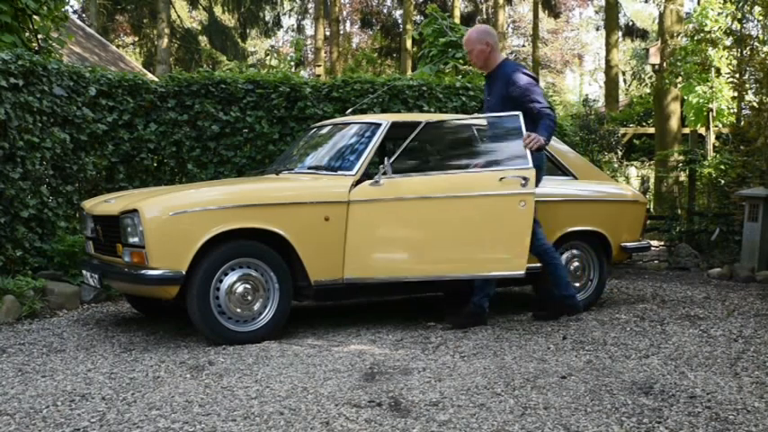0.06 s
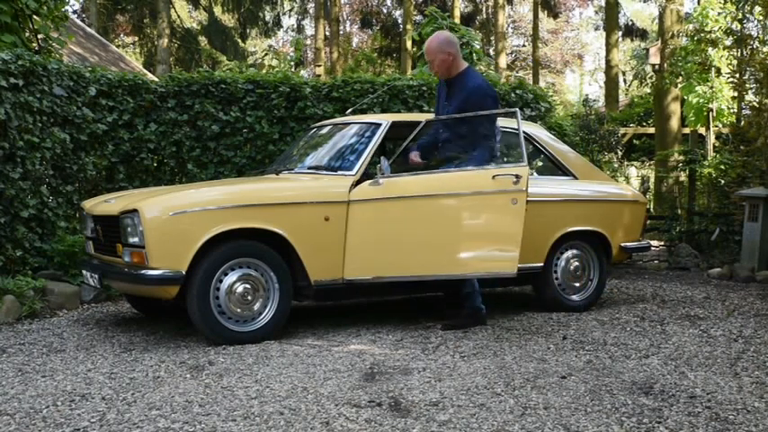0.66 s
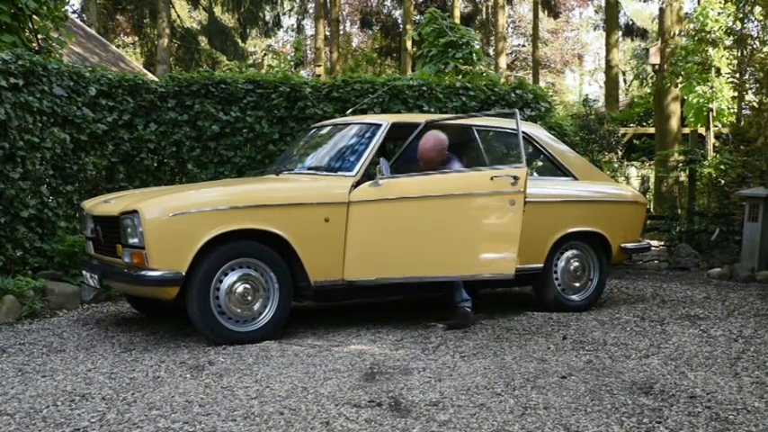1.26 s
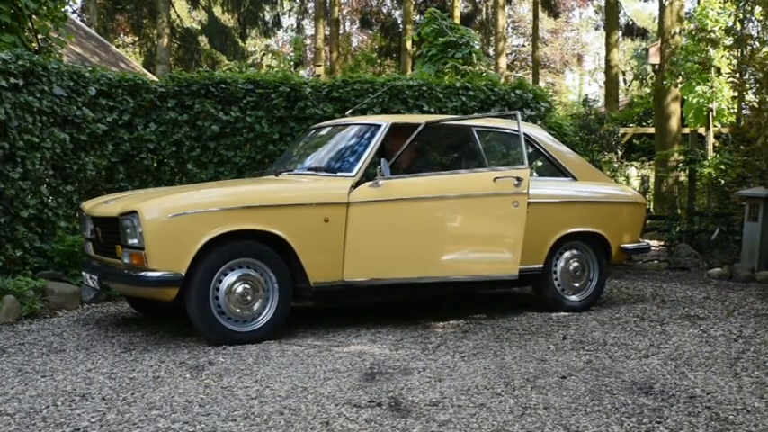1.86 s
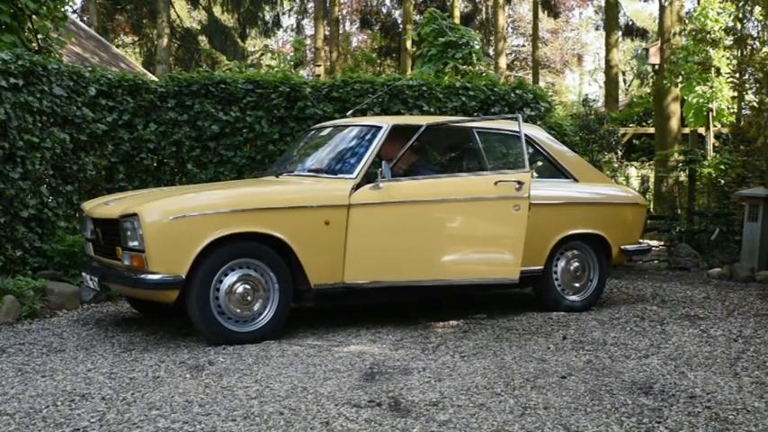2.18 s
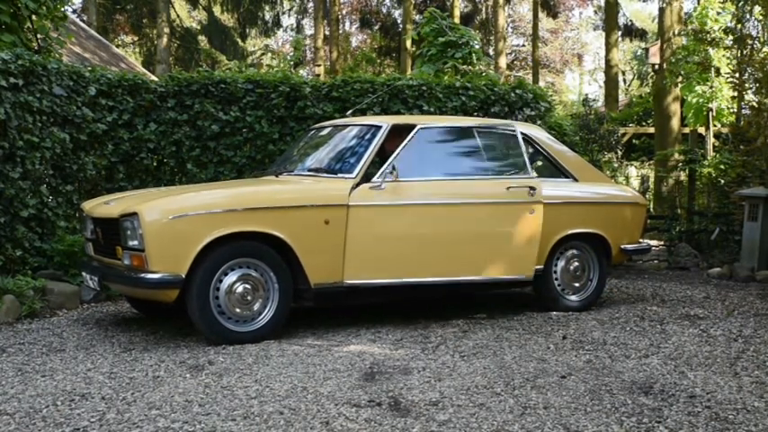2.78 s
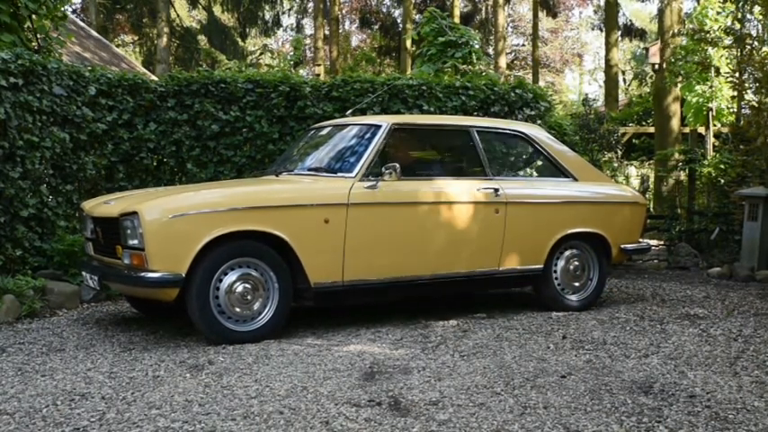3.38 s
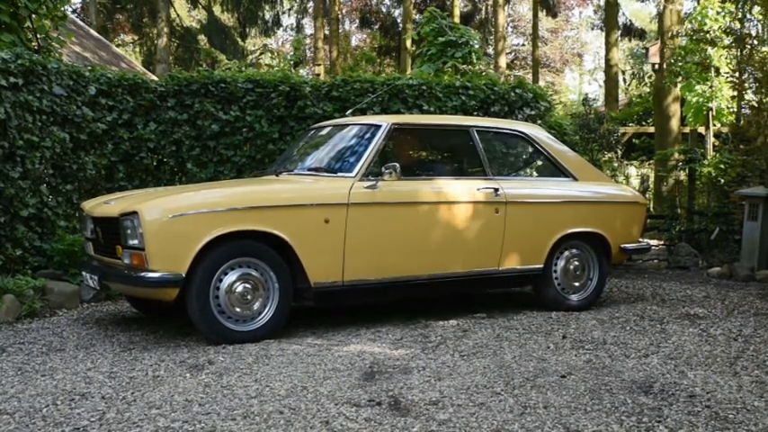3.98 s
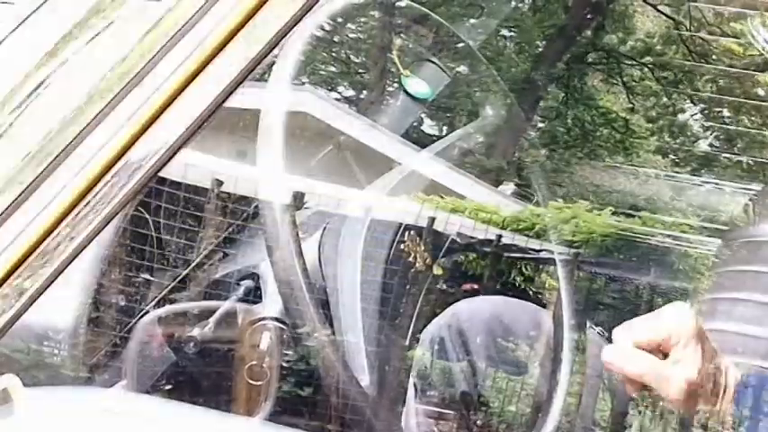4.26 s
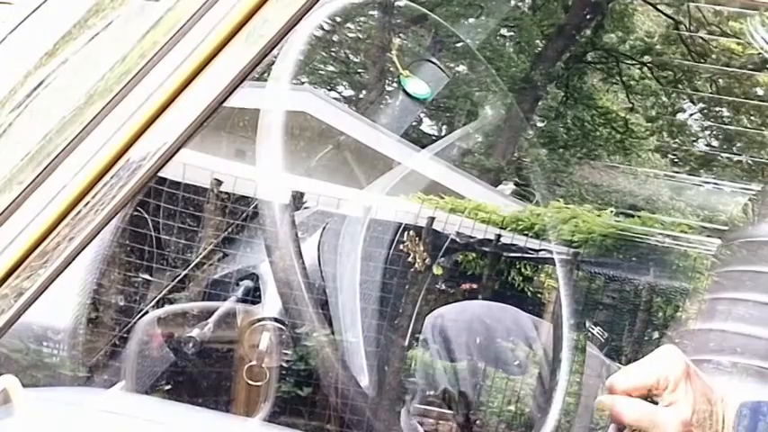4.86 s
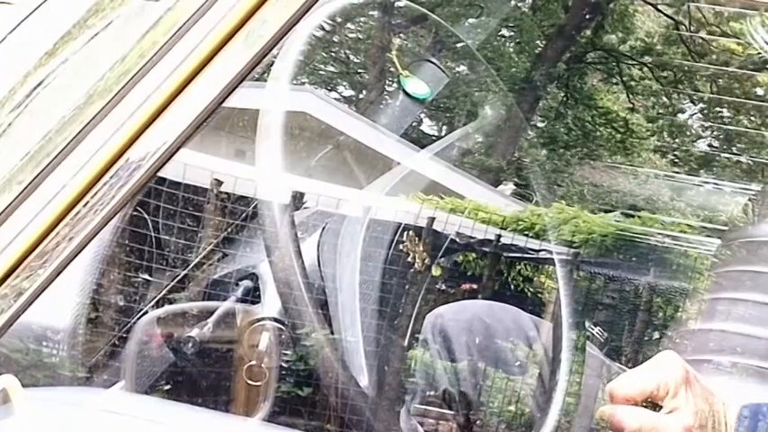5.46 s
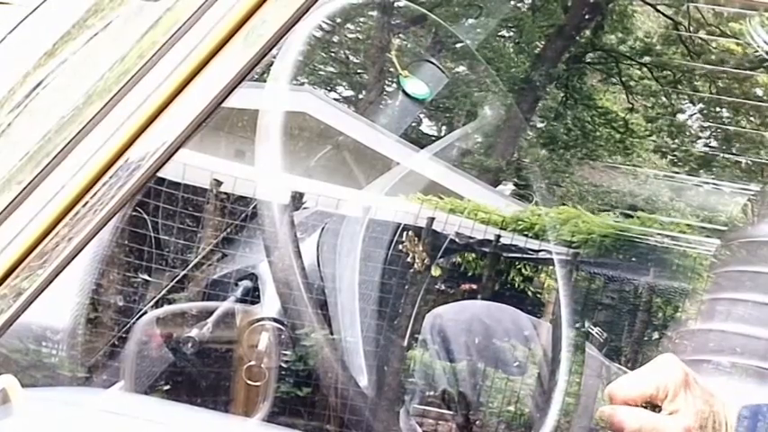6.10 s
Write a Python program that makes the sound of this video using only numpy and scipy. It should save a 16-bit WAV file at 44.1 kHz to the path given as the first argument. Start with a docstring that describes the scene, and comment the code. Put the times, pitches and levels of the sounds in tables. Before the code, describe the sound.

Amid birdsong outdoors, a car door clicks and then slams with a metallic snap and boom, before a finch sings.

```python
"""Car door and finch

Close up in a gravel yard, a man climbs into an old car: cloth hisses, shoes grind, the door stay clicks.
He pulls the door shut: the steel latch snaps twice and the panels boom. A bird twitters hoarsely and
others whistle far off in the woods. Then the scene changes to a quieter spot by the windscreen,
where a finch sings one phrase to the left of the microphones, echoed by the trees."""
import sys
import numpy as np
from scipy import signal
from scipy.fft import rfft, irfft
from scipy.io import wavfile
from scipy.ndimage import map_coordinates

SR = 44100
rng = np.random.default_rng(int(sys.argv[2]) if len(sys.argv) > 2 else 0)


def unload_audio(sound):
    """Save the sound as a 16-bit wav file, at the path given as the first command line argument."""
    columns = np.transpose(np.atleast_2d(sound))
    # keep every value between -1 and 1, then stretch to whole-number steps
    steps = np.round(np.clip(columns, -1, 1) * 32767)
    wavfile.write(sys.argv[1], SR, steps.astype(np.int16))


N = 270333
TIME = np.arange(N) / SR
CHANGE_S = 4.158  # from the yard to the windscreen


# steel striking steel, close up: (time [s], level [dB], tilt [dB/octave], t60 [s])
LATCH_HITS = [(3.4625, -16.5, 0.5, .035), (3.474, -28, -1, 0.087), (3.4905, -17.5, -1.5, .055),
              (3.4985, -21, -1, .03), (3.5068, -6.5, 0.5, .012), (3.5085, -11.5, 1.5, 0.031),
              (3.5235, -27.5, -6.5, .06), (3.533, -30.5, 8.5, .04), (3.555, -30.5, -2, .04)]
# spectrum of each hit: (frequency [Hz], level [dB])
LATCH_COLOUR = [(150, -11), (450, -7), (800, -8.5), (1050, -5.5), (1350, 1), (2100, -3), (2850, 1),
                (3900, -8.5), (5300, -6), (6500, -13), (8000, -10.5), (10000, -21.5), (11500, -15),
                (15000, -40)]
# ring of latch and door frame: (frequency [Hz], level [dB], t60 [s])
LATCH_MODES = [(585, -4, .3), (657, -5, .25), (791, -5, .2), (912, -7, .2), (1300, -2, .17),
               (1338, -2, .17), (1414, 0, .17), (1788, -4, .16), (1880, -4, .2), (2702, -1, .18),
               (2930, 1, .13), (4791, -4, .13), (5356, -1, .1), (7294, -10, .15), (8193, -10, .15)]
def latch(ring_db=-33.5):
    """The claw passes the safety catch, snaps home and rattles; the yard throws it back."""
    steel = blows(LATCH_HITS, LATCH_COLOUR, rise_s=.00022, width=.59)
    steel += amp(ring_db) * struck(LATCH_HITS, LATCH_MODES)
    return steel + amp(-8.7) * echoes(steel, YARD_T60, delay_s=.0042)


# the door pressing on its rubber seal: (time [s], level [dB], length [s])
SEAL_PUSHES = [(3.4502, -32.5, .002), (3.4968, -11.5, 0.0021), (3.5146, -22.5, .002)]
# door panels and cabin air: (frequency [Hz], level [dB], t60 [s])
PANEL_MODES = [(49, -12, .11), (75.5, -8, .58), (123, -9, .42), (157.5, -2, .27), (195.4, -3, .3),
               (225, -12, .23), (276, -13, .42), (345, -19, .22), (481, -20, .22)]
# the car body shaking, close up: (time [s], level [dB], tilt [dB/octave], t60 [s])
SHAKES = [(3.451, -23.5, 4.5, 0.075), (3.463, -25, -1.5, 0.36), (3.497, -21, 0, 0.29),
          (3.56, -23, -5.5, 0.32)]
# spectrum of the shaking: (frequency [Hz], level [dB])
SHAKE_COLOUR = [(25, -6.5), (70, 0.5), (160, -0.5), (300, -1), (450, -7), (650, -8), (1200, -22),
                (4000, -63.5)]
def door_boom(swell_s=.0057):
    """The seal hands the door's momentum to panels and cabin, and the whole body shakes."""
    out, t = np.zeros((2, N)), TIME[:SR]
    panels = ring(PANEL_MODES, t) * (1 - np.exp(-t / swell_s))
    for s, db, length in SEAL_PUSHES:
        push = np.sin(np.pi * np.minimum(t[:SR // 20] / length, 1))
        add(out, s, amp(db) * signal.fftconvolve(panels, push / push.sum()))
    return out + blows(SHAKES, SHAKE_COLOUR, rise_s=.002, width=.9)


# clicks and knocks at the open door: (time [s], level [dB], tilt [dB/octave], t60 [s])
CLICKS = [(.1612, -39.5, 6, .015), (.2042, -40.5, 5, .02), (.4015, -31, -6, .018), (.8078, -22, 0, 0.024),
          (.810, -19.5, 0.5, 0.036), (.837, -47, 11, 0.039), (.992, -36, -6, 0.034),
          (1.022, -35.5, -1.5, 0.032), (2.98, -38, -7.5, 0.051)]
# spectrum of each click: (frequency [Hz], level [dB])
CLICK_COLOUR = [(150, -15.5), (350, -5.5), (900, -13.5), (1250, -3), (1500, 4.5), (1850, -5), (2700, -8),
                (3600, -4), (4800, -17), (6500, -15), (9000, -24.5), (14000, -43)]
# ring of the stay: (frequency [Hz], level [dB], t60 [s])
STAY_MODES = [(1520, 3, 0.085), (1540, -31.5, 0.087), (1920, -9, 0.19), (2500, -9, 0.12), (3700, -29, 0.1),
              (5717, -26, .15)]
def door_stay(ring_db=-19.5):
    """The door stay jumps its notch; smaller knocks sound as the man gets in."""
    steel = blows(CLICKS, CLICK_COLOUR, rise_s=.00032, width=.44)
    steel += amp(ring_db) * struck(CLICKS, STAY_MODES)
    return steel + amp(-6.3) * echoes(steel, YARD_T60, delay_s=.006)


# bumps in the seat, heard from both spots: (time [s], level [dB], tilt [dB/octave], t60 [s])
BUMPS = [(.398, -37, 6, .07), (.809, -33, 3.5, 0.13), (.97, -37.5, -1, 0.36), (1.2, -33, -2.5, 0.13),
         (1.4, -38.5, -5, 0.32), (1.455, -38, -6, 0.28), (1.6, -38, -3.5, 0.32), (3.865, -41, -20, 0.24),
         (5.283, -49, 3.5, 0.16), (5.69, -57, 2.5, 0.2), (5.865, -46, -4.5, 0.12),
         (5.987, -50.5, -0.5, 0.15)]
# their dull spectrum: (frequency [Hz], level [dB])
BUMP_COLOUR = [(40, -2.5), (130, 0.5), (300, 1.5), (700, -7), (1400, -19), (4000, -34), (12000, -63)]
def seat(fidgets=6, gap_s=.22, fidget_db=-56, tilt_db=1.5, t60_s=.24):
    """The man bumps about as he settles, then fidgets faintly at uneven intervals."""
    steps = np.arange(1, fidgets + 1) + rng.uniform(-.5, .5, fidgets)
    faint = [(CHANGE_S + step * gap_s, fidget_db, tilt_db, t60_s) for step in steps]
    return blows(BUMPS + faint, BUMP_COLOUR, rise_s=.0045, width=.81)


# clothes sliding over the seat, near the microphones: (start [s], length [s], level [dB])
SLIDES = [(.046, .095, -42.5), (.14, 0.17, -53.5), (.92, 0.32, -44), (1.09, 0.095, -44),
          (1.425, 0.2, -45.5), (1.575, .1, -42), (1.625, .19, -52)]
# hiss of the cloth: (frequency [Hz], level [dB])
CLOTH_COLOUR = [(1500, -27.5), (3000, -3), (5000, -2.5), (7800, 3.5), (10500, 0.5), (13000, -2.5),
                (15000, -15)]
# shoes on the ground beside the car: (start [s], length [s], level [dB])
SCUFFS = [(.03, 0.3, -45), (.935, .2, -43), (1.1, 0.24, -48.5), (1.43, 0.083, -45)]
# crunch of the gravel: (frequency [Hz], level [dB])
GRAVEL_COLOUR = [(200, 5), (500, 1), (1200, 1.5), (2500, -3), (5000, -21.5)]
def rustle(cloth_grain_db=1.5, gravel_grain_db=3.5, grow_db_per_s=52):
    """Cloth hisses over the seat and shoes grind the gravel; both swell as the yard scene ends."""
    growing = amp(grow_db_per_s * np.minimum(TIME - CHANGE_S, 0))
    sliding = strokes(SLIDES, peak_share=.3) + amp(-51.5) * growing
    scuffing = strokes(SCUFFS, peak_share=.31) + amp(-51) * growing
    cloth = unit(noise(CLOTH_COLOUR, N) * amp(cloth_grain_db * wobble(300, N)))
    gravel = unit(noise(GRAVEL_COLOUR, N) * amp(gravel_grain_db * wobble(400, N)))
    return sliding * cloth + scuffing * gravel


# two high chips, left of the windscreen: (time [s], level [dB])
CHIPS = [(5.15, -47), (5.233, -45)]
# path of one chip: (time in the note [s], pitch [Hz], level [dB])
CHIP_PATH = [(0, 4430, -5), (.006, 7200, -12), (.018, 7500, -14), (.021, 5700, -5), (.027, 6350, -16),
             (.031, 5100, 7), (.038, 5610, 0), (.042, 4000, 1)]
# path of the closing flourish: (time in the note [s], pitch [Hz], level [dB])
FLOURISH_PATH = [(0, 2650, -13), (.05, 2240, -3), (.1, 2280, -9), (.13, 3100, -3), (.19, 3680, -1),
                 (.245, 3900, -2.5), (.28, 4100, -12), (.33, 3970, -24.5)]
def finch(flourish_s=5.342, flourish_db=-50.5):
    """A trill, two chips and a buzzy rising flourish, echoed by far woods and a near hedge."""
    song, chips = trill(), np.zeros((2, N))
    add(song, flourish_s, amp(flourish_db) * note(FLOURISH_PATH, buzz=.08, buzz_hz=1102, third_db=-22))
    for s, db in CHIPS:
        add(chips, s, amp(db) * note(CHIP_PATH, buzz=.045, buzz_hz=909, second_db=-24))
    scattered = song + amp(-3) * chips  # leaves soak up the highest notes
    woods = amp(-4.7) * echoes(scattered, WOODS_T60, delay_s=.012)
    hedge = amp(-5) * echoes(scattered, YARD_T60, delay_s=.002)
    direct = place(song + chips, left_db=5.5, lead_s=.000334)
    return direct + place(woods + hedge, left_db=3, lead_s=.0003)


# the finch's upward flick: (time in the note [s], base pitch [Hz], level [dB])
FLICK_PATH = [(0, 4500, -14), (.003, 5150, -2), (.006, 5500, -5), (.009, 7000, -20), (.014, 8200, -28)]
# its falling slur: (time in the note [s], base pitch [Hz], level [dB])
SLUR_PATH = [(0, 4210, -6.5), (.008, 4595, 1.5), (.016, 3850, -2.5), (.036, 3002, 1), (.045, 2243, -10),
             (.056, 3200, 0), (.071, 3000, -7), (.086, 1920, -12.5)]
def trill(count=7, start_s=4.195, gap_s=.1374, loudest_s=4.78, peak_db=-45.5, swell_db_per_s=7):
    """Evenly spaced slurs, each led in by a flick, swell and ease off while the pitch sinks."""
    out = np.zeros((2, N))
    for k in range(count):
        s = start_s + k * gap_s
        db = peak_db - swell_db_per_s * abs(s - loudest_s)
        pitch = 1.01 - .0353 * (s - start_s)
        lead_s = .014
        if k == 0:  # the first slur starts high, its flick early
            pitch += .05
            lead_s += .021
        add(out, s - lead_s, amp(db - 2) * note(FLICK_PATH, pitch, buzz=.032))
        add(out, s, amp(db) * note(SLUR_PATH, pitch, buzz=.0505, buzz_hz=1000, third_db=-28))
    return out


# rasp of a bird in the yard, off to the right: (frequency [Hz], level [dB])
RASP_COLOUR = [(3500, -15), (4800, -7.5), (5300, -4), (6000, -7), (7000, -6.5), (8600, -2.5), (9600, -6.5),
               (10700, -7), (12000, -14), (15000, -28)]
# the squeak that starts each call: (time in the note [s], base pitch [Hz], level [dB])
SQUEAK_PATH = [(0, 5040, -2), (.004, 5680, 2), (.012, 5200, -16), (.04, 5300, -6)]
def twitter(count=10, start_s=1.92, gap_s=.0841, strong_db=-44, weak_db=-49.5,
            attack_s=.0076, fade_s=.044):
    """Short hoarse calls: an opening one, then strong and weak in turn at an even pace."""
    rasp, squeaks, t = np.zeros((2, N)), np.zeros((2, N)), TIME[:2 ** 13]
    swell = (1 - np.exp(-t / attack_s)) * np.exp(-(t / fade_s) ** 2 / 2)
    opening = (1.856, -45.5)  # (time [s], level [dB])
    run = [(start_s + k * gap_s, weak_db if k % 2 else strong_db) for k in range(count)]
    for s, db in [opening] + run:
        pitch = 1 + .0305 * rng.uniform(-1, 1)
        add(rasp, s, amp(db) * swell * noise(RASP_COLOUR, len(t), pitch=pitch))
        add(squeaks, s, amp(db - 1.5) * note(SQUEAK_PATH, pitch, buzz=.06, buzz_hz=900))
    return rasp + squeaks + amp(-.5) * echoes(squeaks, YARD_T60, delay_s=.005)


# birds deep in the woods: (time [s], length [s], start pitch [Hz], end pitch [Hz], level [dB])
WHISTLES = [(.33, .32, 2560, 2450, -61), (1.2, .06, 3080, 3020, -54), (1.245, .1, 3980, 4020, -56.5),
            (1.46, .08, 4200, 4230, -56), (1.695, .03, 3400, 3480, -52), (1.74, .12, 3750, 4050, -55),
            (3.69, .14, 2260, 2120, -56), (3.92, .2, 4080, 4020, -64), (4.47, .15, 1920, 1830, -66),
            (5.7, .24, 5950, 5350, -77.5)]
def far_birds(waver_hz=55):
    """Wavering whistles that reach the microphones mostly as echoes."""
    song = np.zeros((2, N))
    for s, length, start_hz, end_hz, db in WHISTLES:
        arch = [(0, start_hz, -3), (length / 2, (start_hz + end_hz) / 2, 1), (length, end_hz, -4)]
        add(song, s, amp(db) * note(arch, buzz=waver_hz / start_hz, buzz_hz=350))
    woods = amp(-4.5) * echoes(song, WOODS_T60, delay_s=.01)
    yard = amp(-3) * echoes(song, YARD_T60, delay_s=.003)
    return amp(-4) * song + woods + yard


# open air in the yard: (frequency [Hz], level [dB])
YARD_AIR = [(15, -54), (25, -12), (115, -1), (167, -6), (293, -10), (363, -14), (529, -13), (927, -15),
            (1810, -24.5), (2500, -26), (3090, -26.5), (7090, -28.5), (9770, -32), (12800, -39.5),
            (15000, -72)]
# calmer air by the windscreen: (frequency [Hz], level [dB])
WINDSCREEN_AIR = [(22, -11), (45, -3), (64, 5), (95, -14), (170, -15), (300, -22), (650, -27),
                  (1500, -41.5), (2600, -46), (4000, -36), (8000, -53.5), (12800, -46), (14000, -57)]
def air(colour, db, swell_db):
    """Distant roar and leaves, gently swelling."""
    return amp(db + swell_db * wobble(6, N)) * noise(colour, N)


# decay of near reflections around the yard: (frequency [Hz], t60 [s])
YARD_T60 = [(100, 0.54), (500, 0.2), (2000, 0.24), (6000, 0.3), (12000, 0.18)]
# decay of far reflections among the trees: (frequency [Hz], t60 [s])
WOODS_T60 = [(200, .5), (1500, 0.88), (4000, 0.66), (9000, 0.29)]
def echoes(x, t60s, delay_s):
    """Scattered reflections: sparse taps, each band dying at its own speed."""
    taps = rng.choice([-1., 1.], (2, SR)) * (rng.random((2, SR)) < .1)
    hz, t, bands = signal.stft(taps, SR, nperseg=256)
    hz = hz[:, None]
    bands = stereo(*bands, hz) * amp(-60 * t / read(t60s, hz))
    tail = signal.istft(bands, SR, nperseg=256)[1][:, :SR] * (TIME[:SR] > delay_s)
    tail /= np.linalg.norm(tail[0])
    return signal.fftconvolve(x.mean(0)[None], tail, axes=1)[:, :N]


# likeness of diffuse sound at the two microphones: (frequency [Hz], correlation [0..1])
MIC_LIKENESS = [(30, 1), (200, 1), (600, 0.95), (1500, 0.24), (3000, 0.18), (6000, 0.084), (12000, 0.054)]
def stereo(mid, side, hz):
    """Left and right spectra: the bass is alike at both microphones, the treble less so."""
    likeness = read(MIC_LIKENESS, hz)
    mid, side = mid * np.sqrt(1 + likeness), side * np.sqrt(1 - likeness)
    return np.array([mid + side, mid - side])


def place(x, left_db, lead_s):
    """A sound off to one side differs in level and arrival time between the microphones."""
    turn = np.exp(1j * np.pi * np.fft.rfftfreq(N, 1 / SR) * lead_s) * amp(left_db / 2)
    return irfft(rfft(x) * np.array([turn, 1 / turn]), N)


def noise(colour, size, tilt=0, pitch=1):
    """Stereo noise of a given colour, tilted about 1 kHz in dB per octave."""
    hz = np.fft.rfftfreq(size, 1 / SR)
    mid, side = rfft(rng.standard_normal((2, size)))
    octaves = np.log2(np.maximum(hz, 100) / 1000)
    gain = amp(read(colour, hz / pitch) + tilt * octaves) * (hz > 15)
    return unit(irfft(stereo(mid, side, hz) * gain, size))


def blows(rows, colour, rise_s, width):
    """Each contact chatters for a moment: a burst of noise that dies fast."""
    out, t = np.zeros((2, N)), TIME[:2 ** 14]
    for s, db, tilt, t60 in rows:
        burst = noise(colour, len(t), tilt)
        middle = burst.mean(0)
        burst = unit(middle + width * (burst - middle))
        add(out, s, burst * amp(db - 60 * t / t60) * (1 - np.exp(-t / rise_s)))
    return out


def struck(rows, modes):
    """Each contact sets the metal ringing."""
    out, sound = np.zeros((2, N)), ring(modes, TIME[:SR // 2])
    for s, db, *_ in rows:
        add(out, s, amp(db) * sound)
    return out


def ring(modes, t):
    """A sum of dying sines."""
    return sum(amp(db - 60 * t / t60) * np.sin(2 * np.pi * hz * t) for hz, db, t60 in modes)


def strokes(rows, peak_share, roundness=1.4):
    """Level of rubbing: each stroke swells smoothly to its peak and eases off."""
    power = np.zeros(N)
    for s, length, db in rows:
        ramp = np.interp(TIME, [s, s + peak_share * length, s + length], [0, 1, 0])
        power += (amp(db) * np.sin(np.pi / 2 * ramp) ** roundness) ** 2
    return np.sqrt(power)


def note(shape, pitch=1, buzz=.01, buzz_hz=600, second_db=-36, third_db=-31):
    """A bird's near-pure tone along a pitch path; a fast flutter makes it buzz."""
    s, hz, db = np.transpose(shape)
    t = np.arange(0, s[-1], 1 / SR)
    path = pitch * np.interp(t, s, hz) * (1 + buzz * wobble(buzz_hz, len(t)))
    phase = 2 * np.pi * np.cumsum(path) / SR
    tone = np.sin(phase) + amp(second_db) * np.sin(2 * phase)
    tone += amp(third_db) * np.sin(3 * phase) * (3 * path < SR / 2)
    return amp(np.interp(t, s, db)) * tone * signal.windows.tukey(len(t), .04)


def wobble(rate_hz, size):
    """Smooth random motion of rms 1."""
    knots = rng.standard_normal(int(N / SR * 1000))
    return unit(map_coordinates(knots, [np.arange(size) * rate_hz / SR], order=1, mode="wrap"))


def amp(db):
    """Decibels to gain."""
    return 10 ** (np.asarray(db) / 20)


def unit(x):
    """Scales to rms 1."""
    return x / np.sqrt(np.mean(x ** 2) + 1e-20)


def read(points, hz):
    """Reads a table on a log-frequency axis."""
    f, value = np.transpose(points)
    return np.interp(np.log(hz + 1), np.log(f), value)


def add(mix, s, sound):
    """Mixes a sound in at time s."""
    part = mix[:, max(round(s * SR), 0):][:, :sound.shape[-1]]
    part += sound[..., :part.shape[1]]


def scene(crossfade_s=.0067):
    """The yard gives way abruptly to the calm by the windscreen; the far birds carry to both."""
    in_yard = np.clip((CHANGE_S - TIME) / crossfade_s + .5, 0, 1)
    bumps = seat()
    yard = air(YARD_AIR, db=-45.5, swell_db=.47) + bumps + rustle() + door_stay() + latch() + door_boom()
    yard += place(twitter(), left_db=.5, lead_s=-.000207)
    calm = air(WINDSCREEN_AIR, db=-52.5, swell_db=2.1) + bumps
    windscreen = place(calm, left_db=4.5, lead_s=.0001) + finch()
    return in_yard * yard + (1 - in_yard) * windscreen + far_birds()


def record(dry):
    """The recorder passes nothing much above 15 kHz."""
    lowpass = signal.firwin(511, 15000, window=("kaiser", 9), fs=SR)
    return signal.oaconvolve(dry, lowpass[None], "same")


dry = scene()
out = record(dry)
unload_audio(out)
```